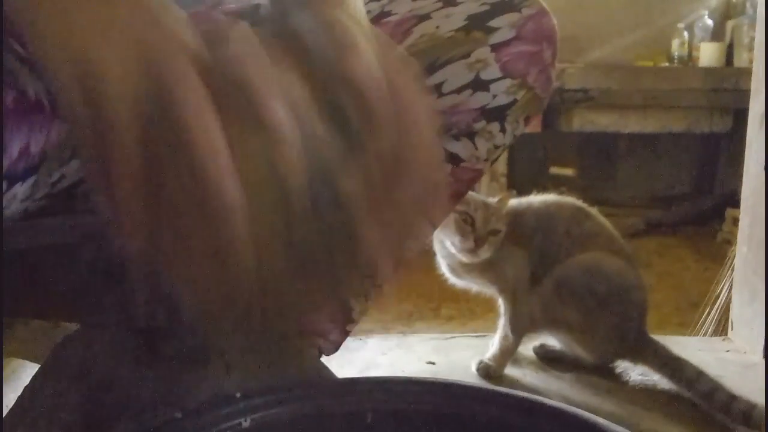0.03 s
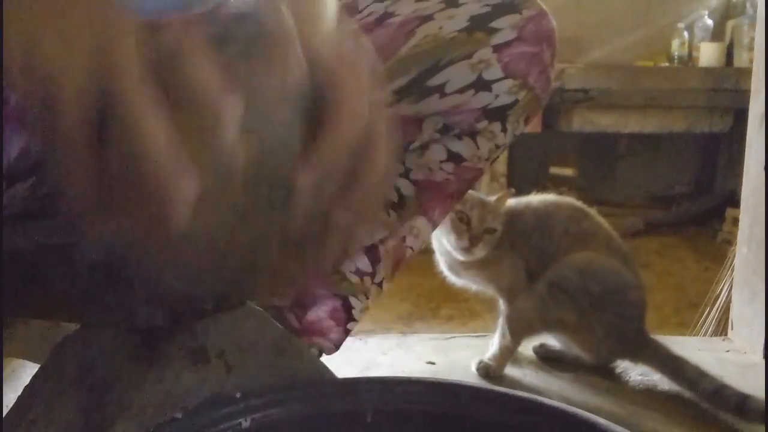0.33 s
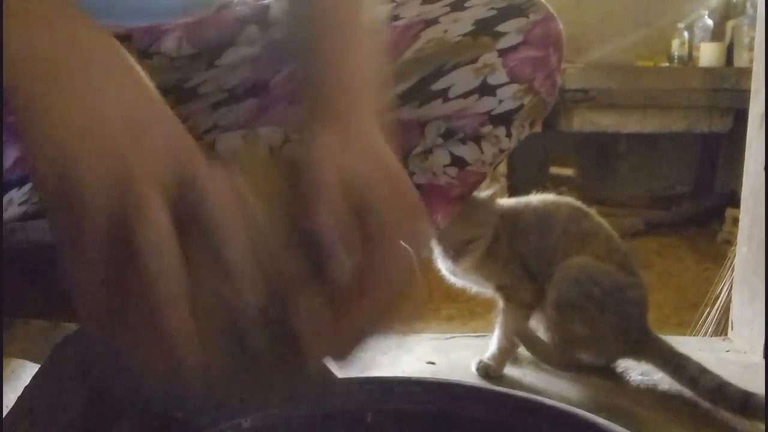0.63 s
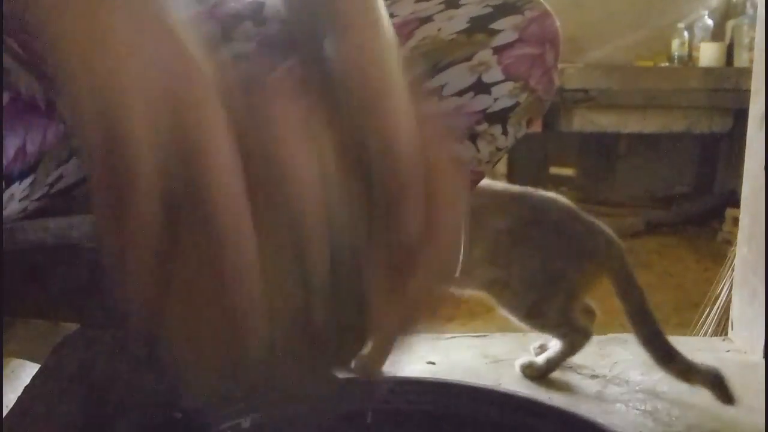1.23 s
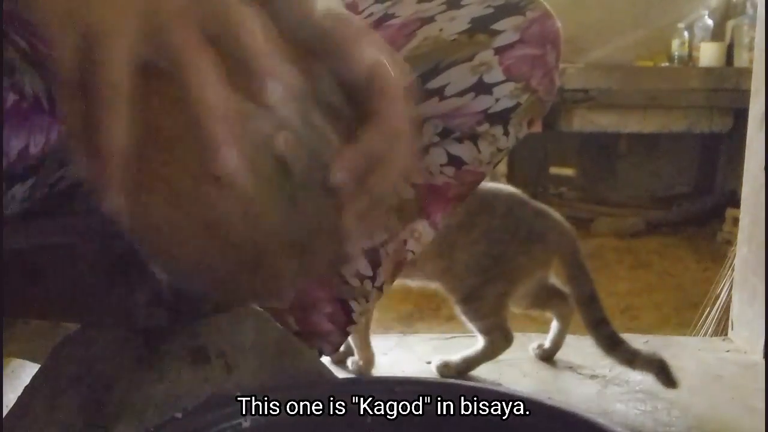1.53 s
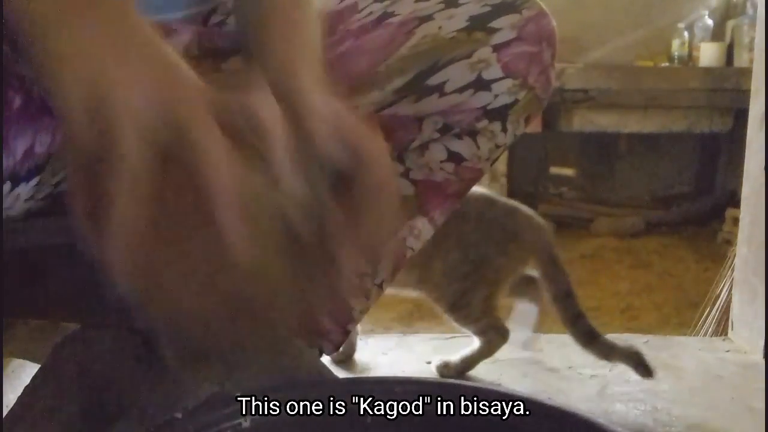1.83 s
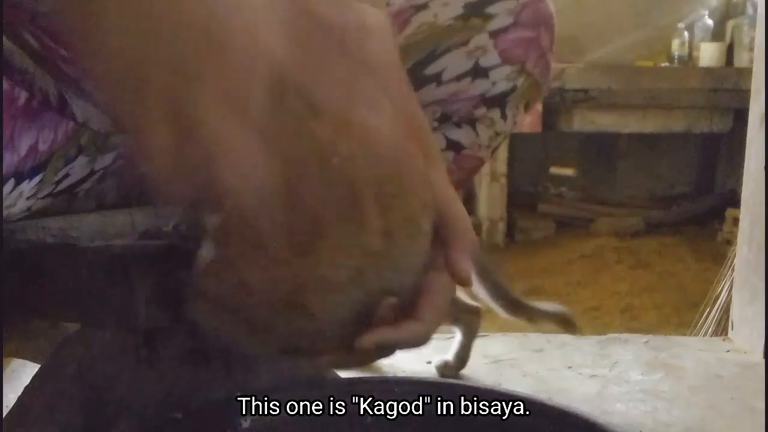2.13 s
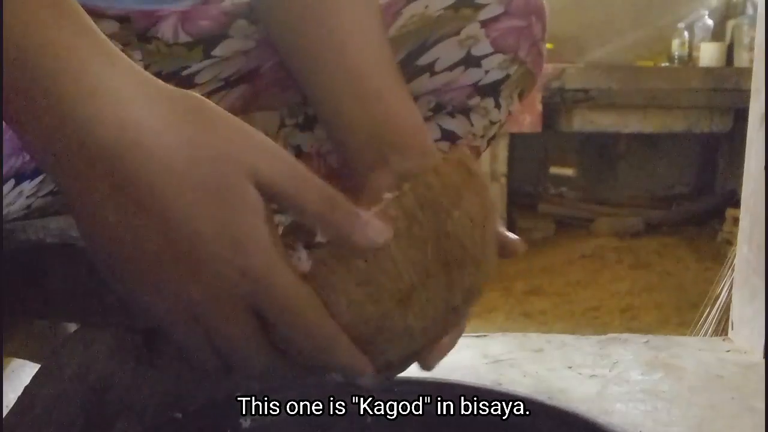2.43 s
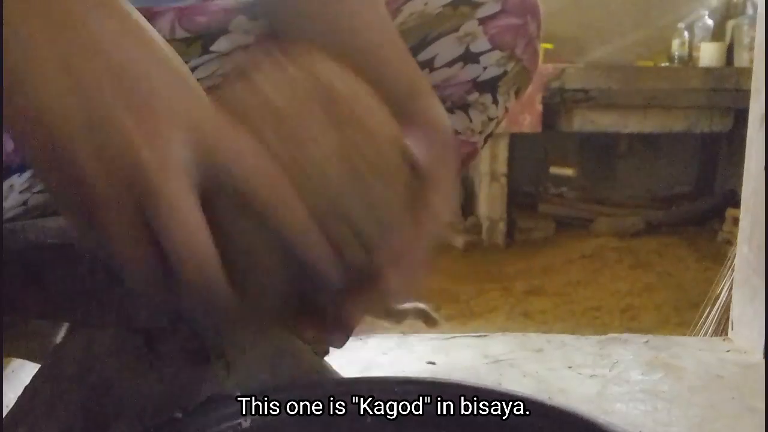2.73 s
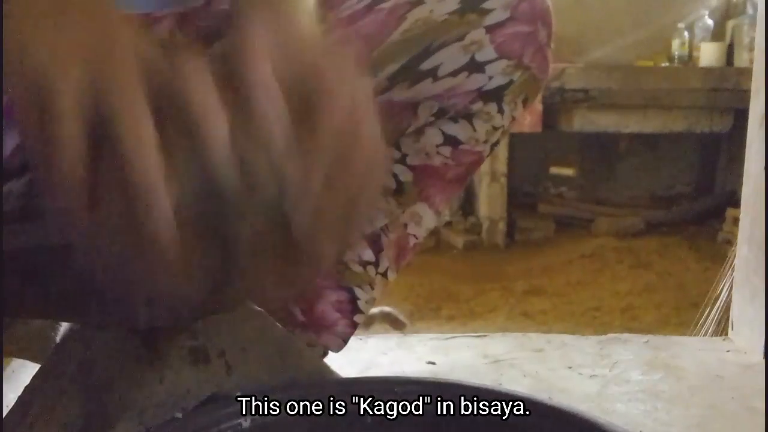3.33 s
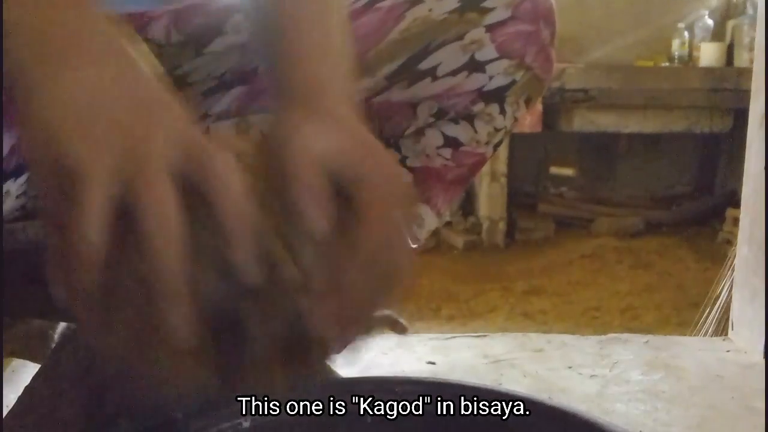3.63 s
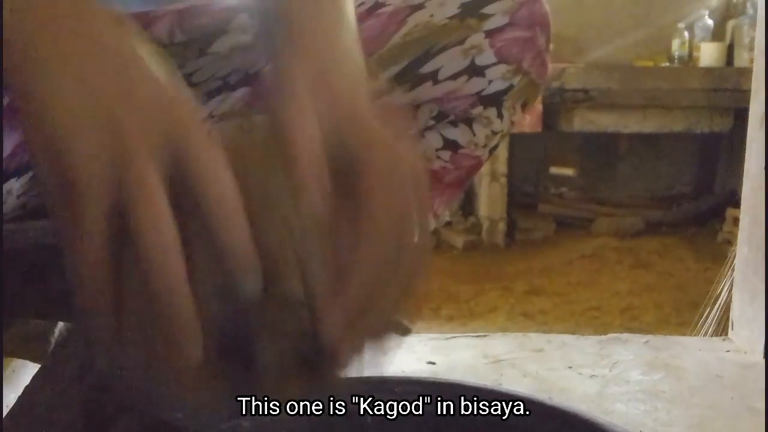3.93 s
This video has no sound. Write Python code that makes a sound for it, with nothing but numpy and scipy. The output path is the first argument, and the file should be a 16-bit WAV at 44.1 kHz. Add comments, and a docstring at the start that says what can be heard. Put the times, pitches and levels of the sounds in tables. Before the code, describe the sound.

Rhythmic, hollow scraping of a coconut half against a toothed blade, with light shell knocks.

```python
"""Indoors, one microphone close to a toothed grater over a basin, where half a coconut is scraped by hand.
A thin, faint mew, probably the cat's, sounds under the first strokes. They come four a second: the shell
taps down on the blade, then the teeth rasp through the flesh and the hollow shell rings. After two
seconds comes a pause, with a very faint whine, as the hands turn the shell and brush its husk.
Four more strokes follow. The room's quiet rumble and hiss lie under it all."""
import sys
import numpy as np
from scipy import signal
from scipy.io import wavfile
from scipy.ndimage import uniform_filter1d

SR = 44100
rng = np.random.default_rng(int(sys.argv[2]) if len(sys.argv) > 2 else 0)


def unload_audio(sound):
    """Save the sound as a 16-bit wav file, at the path given as the first command line argument."""
    columns = np.transpose(np.atleast_2d(sound))
    # keep every value between -1 and 1, then stretch to whole-number steps
    steps = np.round(np.clip(columns, -1, 1) * 32767)
    wavfile.write(sys.argv[1], SR, steps.astype(np.int16))


N = 176400
T = np.arange(N) / SR

# Room tone. Each row: frequency in Hz, relative spectral level in dB.
ROOM_TONE_SPECTRUM = [(12, -23.5), (20, 2), (44, -6), (87, -7), (185, -20.5), (245, -19), (362, -23.5),
                      (725, -26), (1340, -31), (3640, -34.5), (6360, -28.5), (8170, -36.5), (15500, -41)]
# The room's reverberation. Each row: frequency in Hz, time to fall 60 dB (t60) in seconds.
ROOM_DECAY = [(100, 0.52), (600, 0.36), (3000, 0.33), (8000, 0.21), (15000, 0.41)]
# The course of the mew. Each row: time in seconds, level in dB.
MEW_ENVELOPE = [(0, -61.5), (0.029, -48.5), (.075, -51), (.125, -61), (.15, -64), (0.178, -50),
                (.245, -49.5), (.275, -68), (.39, -66), (.5, -82)]
# The mew's timbre. Each row: multiple of the pitch, relative level in dB.
MEW_HARMONICS = [(1, -9), (2, 2.5), (4, -19.5), (7, -7), (8, -26)]
# Hands brushing the husk. Each row: centre in seconds, half width in seconds, level in dB.
HUSK_BRUSHES = [(.45, 0.028, -69), (1.96, 0.036, -65.5), (2.15, 0.021, -59.5), (2.54, 0.043, -62.5),
                (2.715, 0.066, -58), (3.067, 0.069, -60.5), (3.43, 0.1, -70), (3.92, 0.063, -61.5)]
# Husk fibres under the fingers. Each row: frequency in Hz, relative spectral level in dB.
HUSK_SPECTRUM = [(800, -22), (2500, -19.5), (4300, -8.5), (4900, -6), (5550, -3.5), (6120, 3.5),
                 (6400, 0.5), (6950, 0.5), (7600, -7), (11000, -16), (15500, -28)]
# The shell lands on the blade or catches on a tooth; the two faint rows at 2.178 and 2.197 s are crumbs ticking
# down. # Each row: start in seconds, then the levels of knock, tick and thump in dB.
BLOWS = [(0.01, -45, -44.5, -37.5), (0.203, -70, -50, -72), (0.25, -52, -50, -36), (0.262, -33.5, -54, -33),
         (0.282, -32.5, -43.5, -64), (.341, -33.5, -43, -63), (.49, -46.5, -53.5, -38.5),
         (.59, -29, -64, -56), (0.737, -20.5, -67, -53), (0.814, -31, -45, -35), (0.982, -50, -52, -41),
         (1.239, -45.5, -50.5, -38), (1.332, -34.5, -50, -61), (1.497, -46.5, -48, -37.5),
         (1.731, -42.5, -47.5, -45), (1.973, -45, -51.5, -34.5), (2.092, -36.5, -54, -56),
         (2.178, -72, -67, -78), (2.197, -73, -58, -72), (2.5237, -37, -83, -81), (3.025, -48.5, -57, -49),
         (3.038, -50.5, -61, -46), (3.476, -39, -46, -38), (3.546, -29, -35, -44), (3.714, -39, -46.5, -49),
         (3.758, -33.5, -52, -54), (3.961, -46.5, -51.5, -39.5)]
# What a blow rings in the shell. Each row: frequency in Hz, relative level in dB, t60 in seconds.
SHELL_RESONANCES = [(176, -22.5, 0.07), (393, -15, 0.13), (456, -5.5, 0.031), (672, 1, 0.013),
                    (749, -12.5, 0.059), (920, -8.5, 0.026), (1187, -7, 0.023)]
# The basin ringing along. Each row: frequency in Hz, relative level in dB, t60 in seconds.
BASIN_RESONANCES = [(510.5, 2.5, 0.11), (579, -5.5, 0.12), (679.5, -2.5, 0.13), (791.6, 1, 0.15),
                    (899, -23, 0.12), (1240, -2, 0.05)]
# The steel blade ringing. Each row: frequency in Hz, relative level in dB, t60 in seconds.
BLADE_RESONANCES = [(2650, -3.5, 0.07), (3086, -4, 0.093), (4910, -7, 0.048), (6060, -2.5, 0.02),
                    (6030, -0.5, 0.037), (6400, -7, .05)]
# The grater's bench, pushed by the arms. Each row: frequency in Hz, relative spectral level in dB.
BENCH_SPECTRUM = [(20, -44), (55, 6.5), (110, 4.5), (200, 7), (320, -8.5), (700, -43)]
# The hollow shell under the teeth. Each row: frequency in Hz, relative spectral level in dB.
SHELL_SPECTRUM = [(120, -33), (260, -17), (310, -8.5), (360, -2.5), (440, -4), (570, 0.5), (700, -5.5),
                  (790, -1), (860, -5.5), (950, -3), (1100, -10), (1200, -4), (1340, -30), (1570, -18),
                  (1850, -28.5), (3000, -43)]
# Tearing flesh and ringing steel teeth. Each row: frequency in Hz, relative spectral level in dB.
RASP_SPECTRUM = [(500, -24.5), (1500, -5.5), (1870, -11.5), (2030, -4.5), (2400, -8.5), (2730, -1),
                 (2880, -3.5), (3040, 2), (3200, -3.5), (3700, -6), (4250, -4), (5400, -2.5), (6130, 3),
                 (6350, 1), (6560, 0), (7000, -2), (7400, -6.5), (8800, -14), (12000, -23.5), (15500, -35)]
# The scraping strokes. Each row: start, rise, hold and release t60 in seconds, levels of shell, rasp
# and bench in dB, swell over the hold in dB, the pitch the hollow note rises to in Hz.
GRATER_STROKES = [(0.016, 0.027, 0.074, 0.1, -41.5, -42, -53, 3, 558),
                  (0.264, 0.022, 0.059, 0.11, -41.5, -41.5, -52.5, 4.5, 590),
                  (0.506, 0.05, 0.039, 0.11, -41, -40, -54.5, 1.5, 613),
                  (0.739, 0.055, 0.045, 0.097, -41, -41, -53.5, -1, 570),
                  (0.991, 0.045, 0.062, 0.12, -42.5, -42, -54.5, -3.5, 616),
                  (1.248, 0.051, 0.055, 0.078, -39, -41, -52.5, -5, 530),
                  (1.499, 0.043, 0.05, 0.094, -38.5, -38.5, -51, 1, 539),
                  (1.749, 0.033, 0.061, 0.079, -40.5, -41, -56.5, 0, 560),
                  (1.99, 0.043, 0.055, 0.13, -39, -41, -55, 1, 555),
                  (3.221, 0.078, 0.036, 0.099, -40.5, -43, -60, -5, 678),
                  (3.479, 0.046, 0.06, 0.11, -42.5, -44, -57, -3, 461),
                  (3.723, 0.045, 0.068, 0.098, -43, -44.5, -53, -9, 468),
                  (3.976, 0.023, 0.056, 0.11, -41, -41, -62, 12, 567)]

ROOM_TONE_DB, REVERB_DB = -61.5, -17.5
NEAR_SPREAD_S, NEAR_DB = 0.012, -14.5
CONTACT_S, KNOCK_LOW_HZ, KNOCK_TOP_HZ = 0.00055, 256, 1350
THUMP_HZ, THUMP_T60_S, TICK_T60_S, BLOW_RISE_S = 118.5, 0.04, 0.034, 0.0025
BITE_DB, SHELL_LAG_DB = -23, 1.5
BENCH_FADE_DB, BENCH_RELEASE_S = -11.5, 0.36  # the bench eases off as the shell rings up
CHATTER_HZ, CHATTER_DB, UNEVEN_HZ, UNEVEN_DB = 159, 0.77, 36, 1.8  # the pressure is never quite steady
BASIN_DB, BLADE_DB, CLOG_DB_PER_S = -8, -8.5, -3  # the blade rings less as flesh gathers on it
CAVITY_DB, CAVITY_WIDTH_HZ, CAVITY_GLIDE = -6, 149, 0.46
CAVITY_GROW_DB_PER_S, SHELL_FADE_DB_PER_S = 1.13, -.5  # stroke by stroke the hollow note stands out more
TIP_LEAD_S, TIP_S = 0.024, 0.048  # the shell starts to tip just before the hold


def amp(db):
    """Decibels to gain."""
    return 10 ** (np.asarray(db) / 20)


def unit(x):
    """Scales to rms 1."""
    return x / np.sqrt(np.mean(x ** 2) + 1e-20)


def read(points, hz):
    """Reads a table on a log-frequency axis."""
    f, value = np.transpose(points)
    return np.interp(np.log(hz + 1), np.log(f + 1), value)


def add(mix, s, sound):
    """Mixes a sound in at s seconds."""
    part = mix[max(round(s * SR), 0):][:len(sound)]
    part += sound[:len(part)]


def colour(x, spectrum, size=4096):
    """Causal filter of unit energy with the given spectrum."""
    log_gain = np.log(amp(read(spectrum, abs(np.fft.fftfreq(size, 1 / SR)))))
    ring = np.fft.ifft(np.exp(np.conj(signal.hilbert(log_gain)))).real[:size // 2]
    return signal.oaconvolve(x, ring / np.linalg.norm(ring))[:len(x)]


def wander(hz):
    """Smooth random drift of rms 1, up to the given rate."""
    return unit(signal.sosfilt(signal.butter(2, hz, fs=SR, output="sos"), rng.standard_normal(N)))


def clicks(per_s, spread_db):
    """Random clicks of uneven size."""
    size = amp(spread_db * np.minimum(rng.exponential(1, N), 4))
    return unit(size * rng.choice([-1., 1.], N) * (rng.random(N) < per_s / SR))


def modes(table, t):
    """Sum of dying sines."""
    return sum(amp(db) * np.exp(-np.log(1000) * t / t60) * np.sin(2 * np.pi * hz * t)
               for hz, db, t60 in table)


def ringing(x, table):
    """Drives a set of modes, keeping the energy."""
    ring = modes(table, np.arange(SR // 2) / SR)
    return signal.fftconvolve(x, ring / np.linalg.norm(ring))[:N]


def resonate(x, hz, width_hz):
    """A steep resonance that follows the curve hz."""
    turn = np.exp(2j * np.pi * np.cumsum(hz) / SR)
    pole = np.exp(-np.pi * width_hz / SR)
    smooth = signal.lfilter([(1 - pole) ** 2], [1, -2 * pole, pole ** 2], x / turn + 1e-18)
    return 2 * (turn * smooth).real / np.sqrt(np.pi * width_hz / (2 * SR))


def room_tone():
    """The quiet, steady rumble and hiss of the place."""
    return amp(ROOM_TONE_DB) * colour(rng.standard_normal(N), ROOM_TONE_SPECTRUM)


def room_reverb(x):
    """Scattered reflections reach the microphone from 5 ms on, each band dying at its own speed."""
    taps = rng.standard_normal(SR // 2) * (np.arange(SR // 2) > SR // 200)
    hz, t, bands = signal.stft(taps, SR, nperseg=256)
    decay = 0.0016 ** (t / read(ROOM_DECAY, hz)[:, None])
    tail = signal.istft(bands * decay, SR, nperseg=256)[1]
    return amp(REVERB_DB) * signal.fftconvolve(x, tail / np.linalg.norm(tail))[:N]


def near_reflections(x, count=24):
    """Quick reflections off hands, lap and bench blur each grain."""
    taps = np.zeros(SR // 10)
    distance, size = rng.random(count), rng.standard_normal(count)
    delay_s = .001 + NEAR_SPREAD_S * distance
    taps[(delay_s * SR).astype(int)] = size * (1 - .5 * distance)
    reflected = signal.oaconvolve(x, taps / np.linalg.norm(taps))[:N]
    return (x + amp(NEAR_DB) * reflected) / np.hypot(1, amp(NEAR_DB))


def whine(pitch_hz=885, centre_s=2.32, half_width_s=0.09, db=-70.5):
    """A very faint tone that wavers and breaks up in the pause."""
    turns = np.cumsum(pitch_hz * (1 + 0.0148 * wander(hz=45))) / SR
    level = amp(db) * np.exp(-.5 * ((T - centre_s) / half_width_s) ** 2) * wander(hz=25)
    return level * np.sin(2 * np.pi * turns)


def mew(start_hz=839.5, sag_hz_per_s=98):
    """A thin, slowly sagging call, strongest on its second harmonic."""
    times, levels_db = np.transpose(MEW_ENVELOPE)
    pitch_hz = (start_hz - sag_hz_per_s * T) * (1 + 0.0023 * wander(hz=80))
    turns = np.cumsum(pitch_hz) / SR
    voice = sum(amp(db) * np.sin(2 * np.pi * k * turns) for k, db in MEW_HARMONICS)
    return unit(voice) * amp(np.interp(T, times, levels_db)) * (T < times[-1])


def brushing():
    """Soft swells of husk fibres slipping under the fingers."""
    level = sum(amp(db) * np.exp(-.5 * ((T - s) / width) ** 2) for s, width, db in HUSK_BRUSHES)
    return colour(level * clicks(per_s=6200, spread_db=3.5), HUSK_SPECTRUM)


def knocks():
    """Each blow, cushioned by the flesh, rings the shell, crunches on the teeth and thumps the bench."""
    t = np.arange(SR // 5) / SR
    contact = np.sin(np.pi * t[t < CONTACT_S] / CONTACT_S)
    ring = np.convolve(modes(SHELL_RESONANCES, t), contact)[:len(t)]
    ring = signal.sosfilt(signal.butter(5, KNOCK_TOP_HZ, fs=SR, output="sos"), ring)
    ring = signal.sosfilt(signal.butter(1, KNOCK_LOW_HZ, "high", fs=SR, output="sos"), ring)
    attack = np.minimum(t / BLOW_RISE_S, 1)
    thump = attack * modes([(THUMP_HZ, 0, THUMP_T60_S)], t)
    crunch = attack * np.exp(-np.log(1000) * np.maximum(t - BLOW_RISE_S, 0) / TICK_T60_S)
    body, ticks = np.zeros((2, N))
    for start, knock_db, tick_db, thump_db in BLOWS:
        add(body, start, amp(knock_db) * ring / abs(ring).max() + amp(thump_db) * thump)
        add(ticks, start, amp(tick_db) * crunch * rng.standard_normal(len(t)))
    return body + colour(ticks, RASP_SPECTRUM)


def pressure(start, rise, hold, release, swell_db):
    """One stroke: the teeth bite in, drag, and lift off."""
    t = T - start
    bite = np.clip(1 - t / rise, 0, 4) ** 2
    drag = np.clip((t - rise) / hold, 0, 1) - .5
    lift = np.exp(-np.log(1000) * np.maximum(t - rise - hold, 0) / release)
    return amp(BITE_DB * bite + swell_db * drag) * lift


def moving_contact(x, patchy_db):
    """The colour drifts in small patches as the contact point moves."""
    bands = signal.stft(x, nperseg=512, noverlap=384)[2]
    patches = uniform_filter1d(rng.standard_normal(bands.shape), size=3, axis=0)
    patches = uniform_filter1d(patches, size=8, axis=1)
    gain = unit(amp(patchy_db * unit(patches)))
    return signal.istft(bands * gain, nperseg=512, noverlap=384)[1][:N]


def cavity_note(drive):
    """The air in the shell: in each stroke its note starts low and rises as the shell tips off the grater."""
    note_hz = np.zeros(N)
    for start, rise, *_, open_hz in GRATER_STROKES:
        shut = 1 - np.clip((T - start - rise + TIP_LEAD_S) / TIP_S, 0, 1)
        note_hz = np.where((T >= start) | (note_hz == 0), open_hz * (1 - CAVITY_GLIDE * shut), note_hz)
    air = resonate(drive * rng.standard_normal(N), note_hz, CAVITY_WIDTH_HZ)
    return amp(CAVITY_DB + CAVITY_GROW_DB_PER_S * T) * air


def scraping():
    """Teeth tear fine grains and catch in coarser slips that shake shell and bench; blade and basin ring."""
    shell_drive, rasp_drive, bench_drive = np.zeros((3, N))
    for start, rise, hold, release, shell_db, rasp_db, bench_db, swell_db, _ in GRATER_STROKES:
        push = pressure(start, rise, hold, release, swell_db)
        ring_up_db = SHELL_LAG_DB * np.clip((T - start - rise) / hold - .5, -1, 1)
        lean = pressure(start, rise / 2, hold + rise / 2, BENCH_RELEASE_S, BENCH_FADE_DB)
        shell_drive += push * amp(shell_db + ring_up_db)
        rasp_drive += push * amp(rasp_db)
        bench_drive += lean * amp(bench_db)
    chatter = unit(amp(CHATTER_DB * wander(CHATTER_HZ) + UNEVEN_DB * wander(UNEVEN_HZ)))
    slips = chatter * clicks(per_s=1800, spread_db=2.0)
    grains = chatter * clicks(per_s=9000, spread_db=2.5)
    shell = amp(SHELL_FADE_DB_PER_S * T) * colour(shell_drive * slips, SHELL_SPECTRUM)
    cavity = cavity_note(shell_drive * chatter)
    basin = amp(BASIN_DB) * ringing(shell_drive * rng.standard_normal(N), BASIN_RESONANCES)
    teeth = near_reflections(colour(rasp_drive * grains, RASP_SPECTRUM))
    blade = ringing(rasp_drive * rng.standard_normal(N), BLADE_RESONANCES)
    blade *= amp(BLADE_DB + CLOG_DB_PER_S * T)
    bench = colour(bench_drive * slips, BENCH_SPECTRUM)
    scrape = moving_contact(shell, patchy_db=2.0) + moving_contact(teeth, patchy_db=2.6)
    return scrape + cavity + basin + blade + bench


def scene():
    """Mono, close to the grater: the direct sound stands well above the reverberation and room tone."""
    direct = scraping() + knocks() + brushing() + mew() + whine()
    return (room_tone() + direct + room_reverb(direct))[None]


def record(dry):
    """The recorder takes the microphone's signal up to 15.8 kHz."""
    low_pass = signal.firwin(511, 15800, window=("kaiser", 9), fs=SR)
    return signal.oaconvolve(dry, low_pass[None], "same")


dry = scene()
out = record(dry)
unload_audio(out)
```